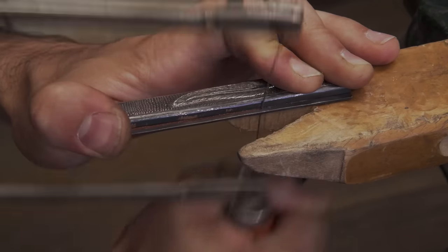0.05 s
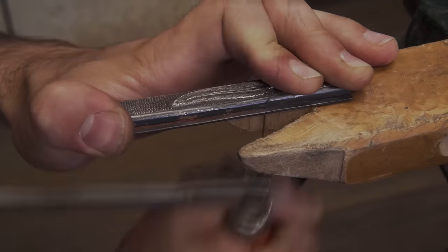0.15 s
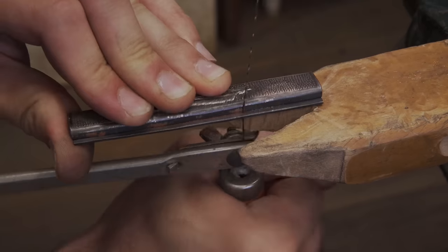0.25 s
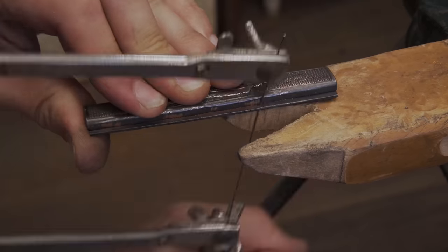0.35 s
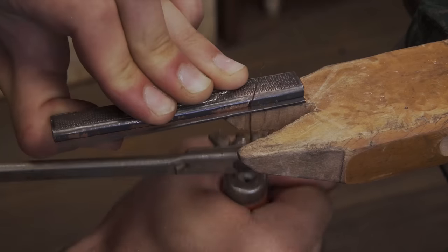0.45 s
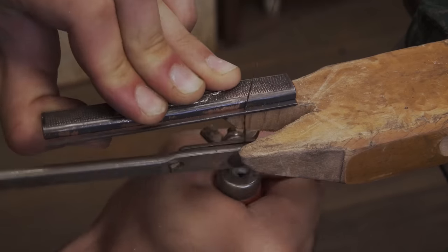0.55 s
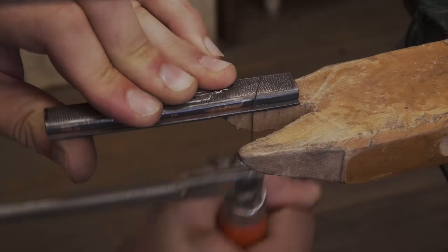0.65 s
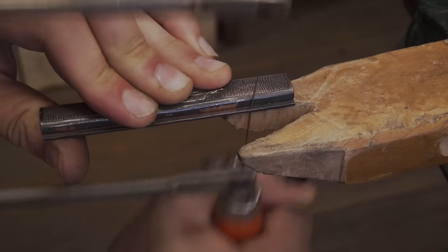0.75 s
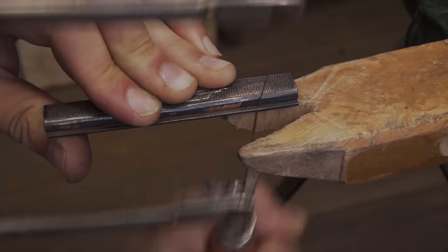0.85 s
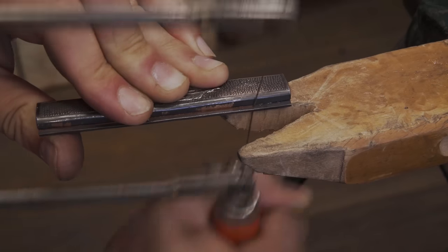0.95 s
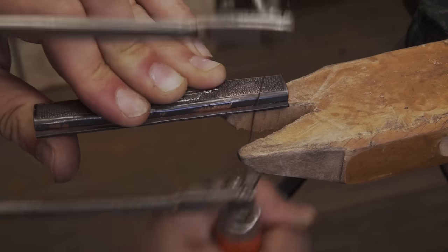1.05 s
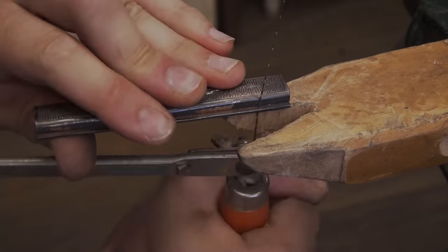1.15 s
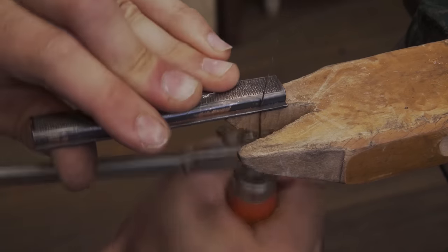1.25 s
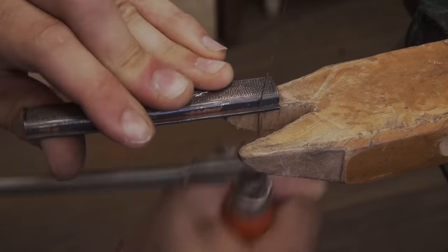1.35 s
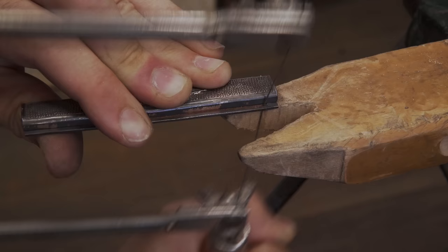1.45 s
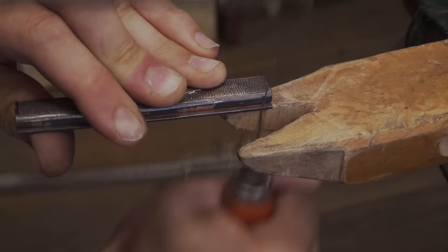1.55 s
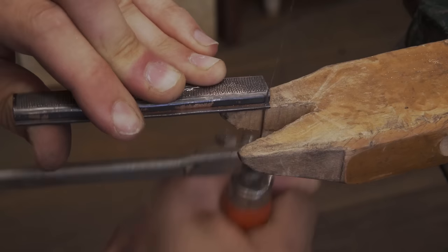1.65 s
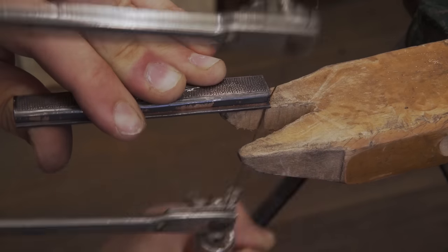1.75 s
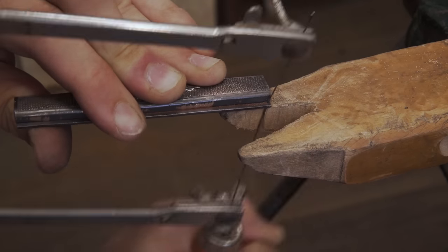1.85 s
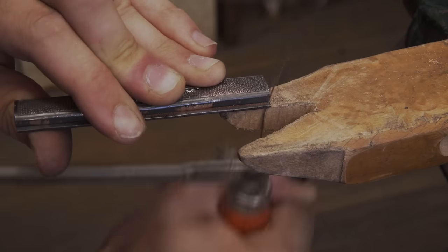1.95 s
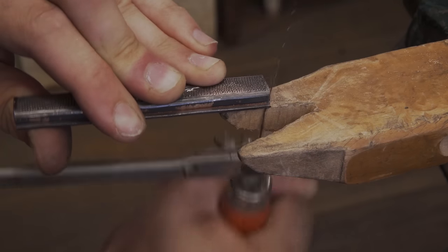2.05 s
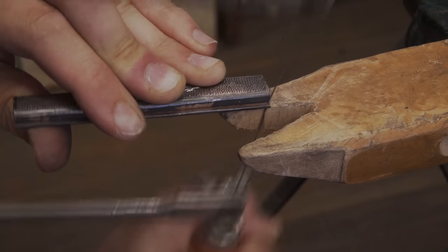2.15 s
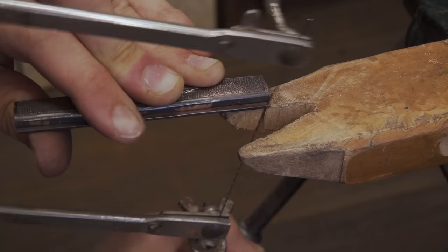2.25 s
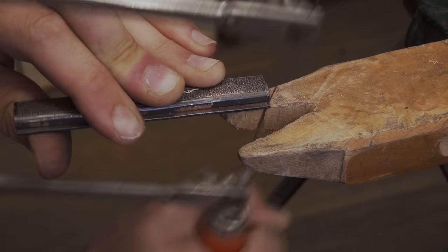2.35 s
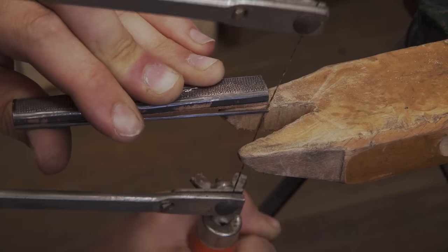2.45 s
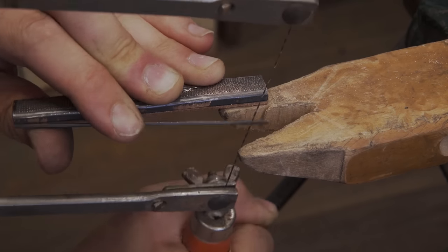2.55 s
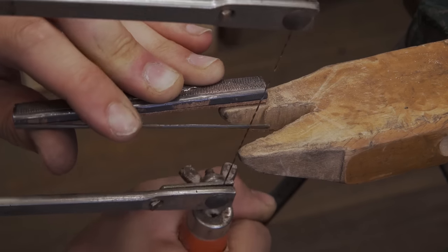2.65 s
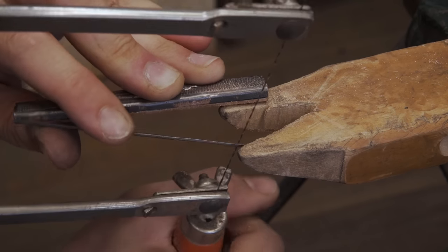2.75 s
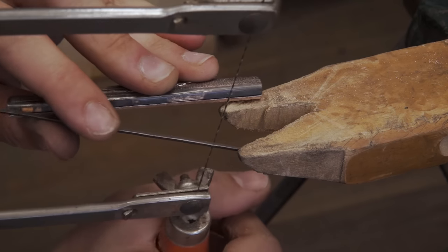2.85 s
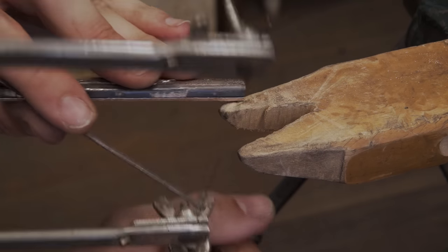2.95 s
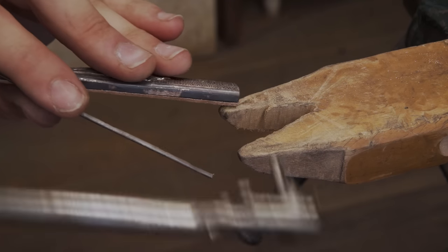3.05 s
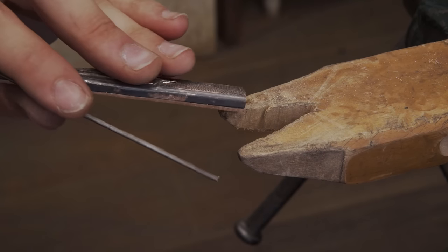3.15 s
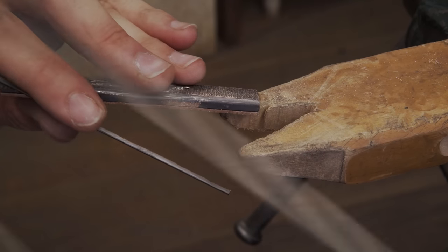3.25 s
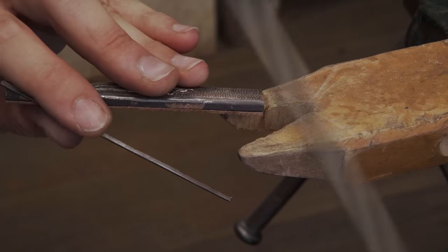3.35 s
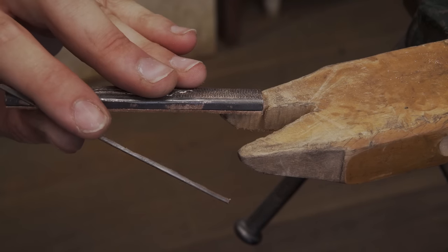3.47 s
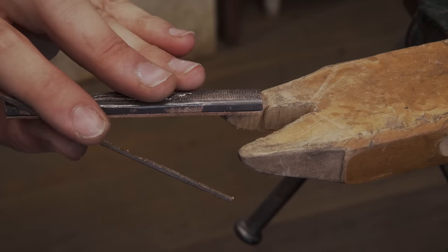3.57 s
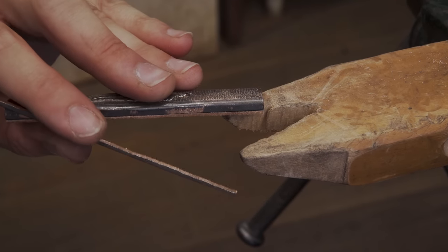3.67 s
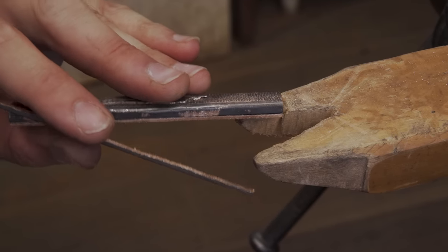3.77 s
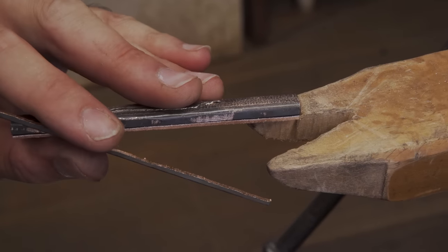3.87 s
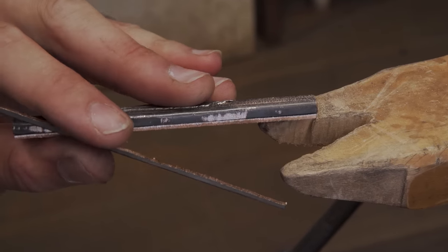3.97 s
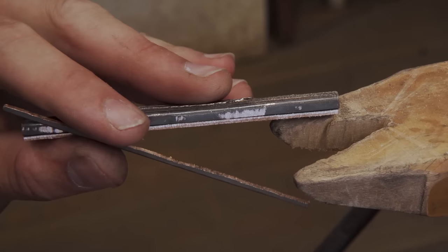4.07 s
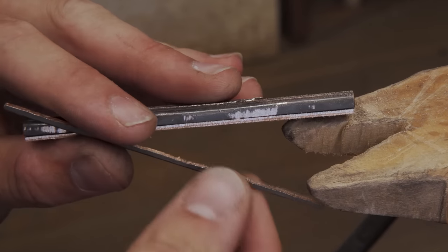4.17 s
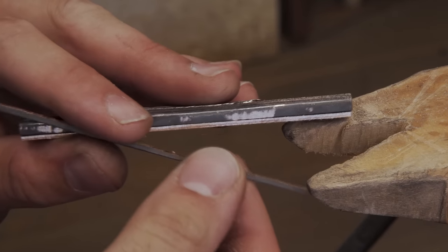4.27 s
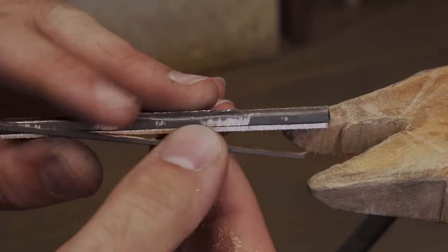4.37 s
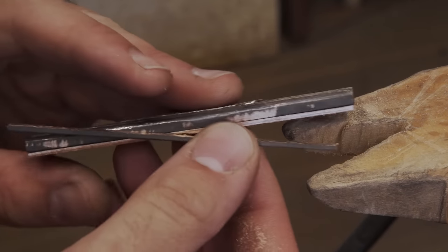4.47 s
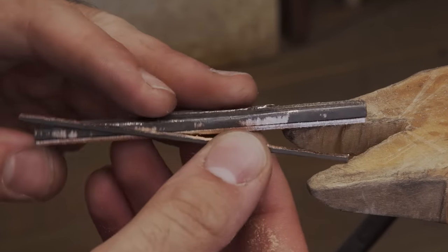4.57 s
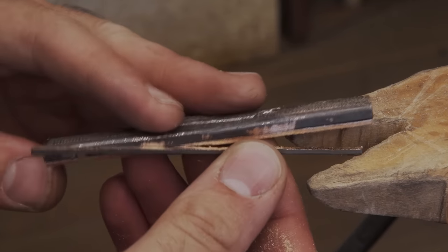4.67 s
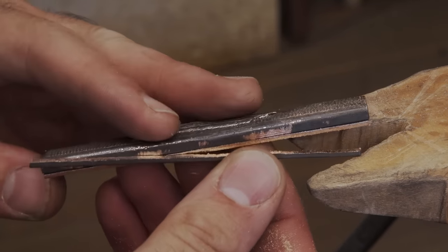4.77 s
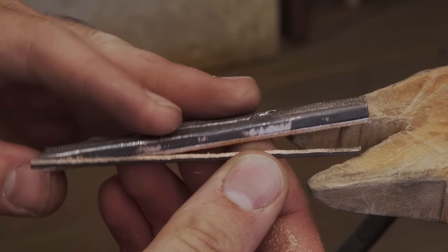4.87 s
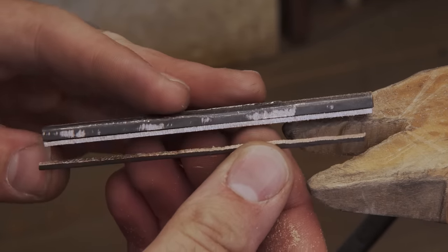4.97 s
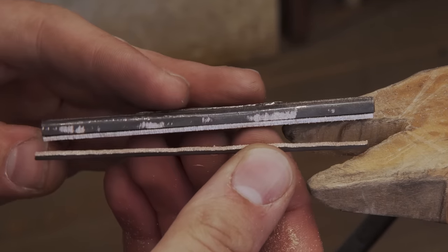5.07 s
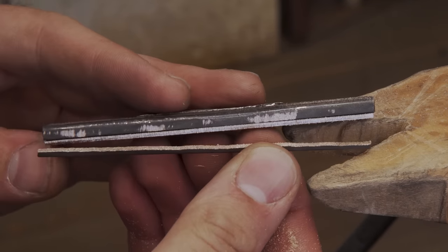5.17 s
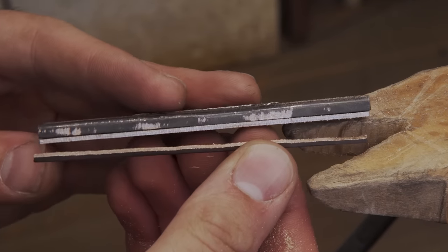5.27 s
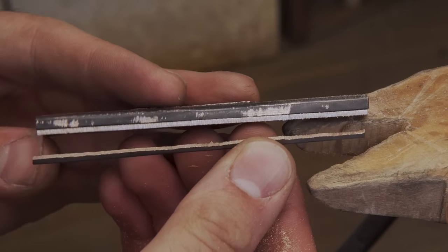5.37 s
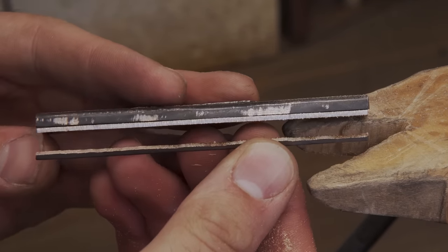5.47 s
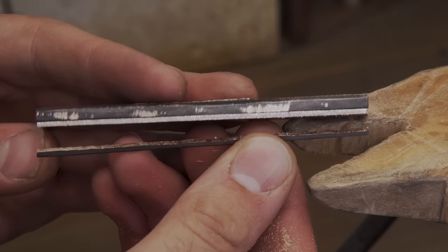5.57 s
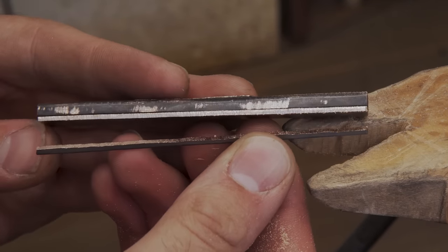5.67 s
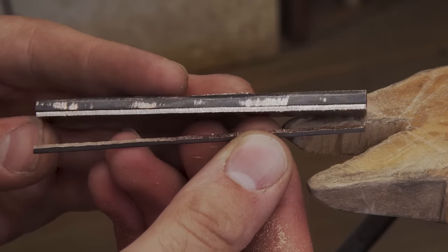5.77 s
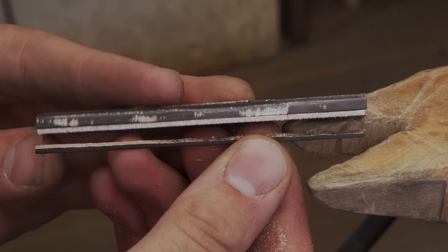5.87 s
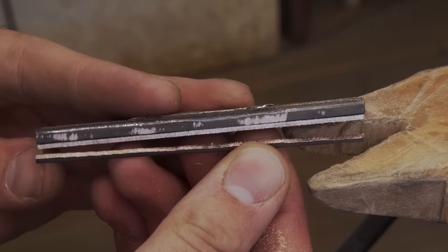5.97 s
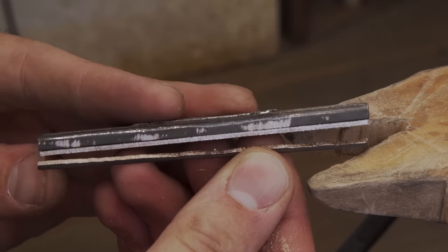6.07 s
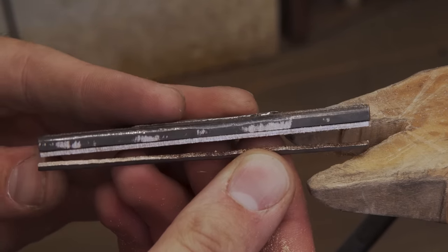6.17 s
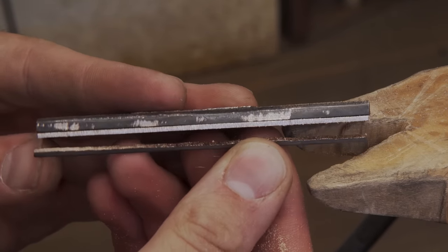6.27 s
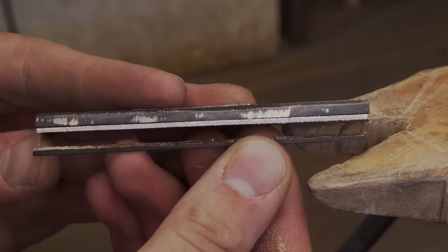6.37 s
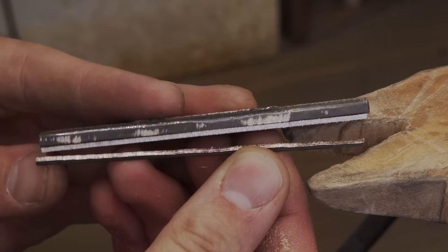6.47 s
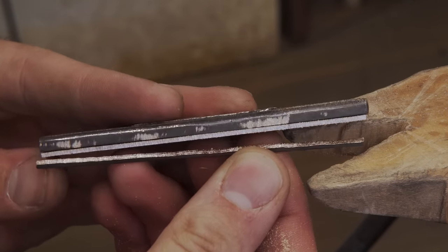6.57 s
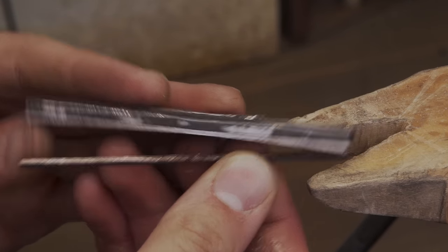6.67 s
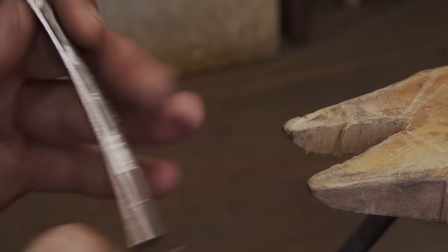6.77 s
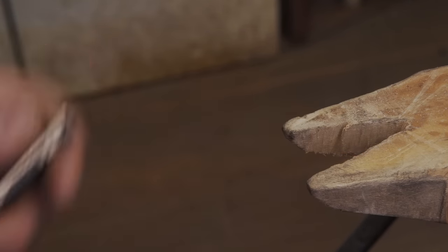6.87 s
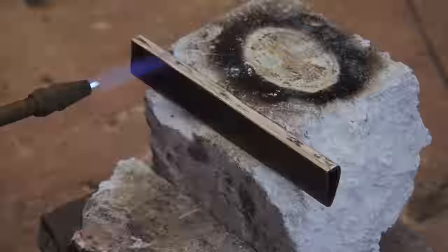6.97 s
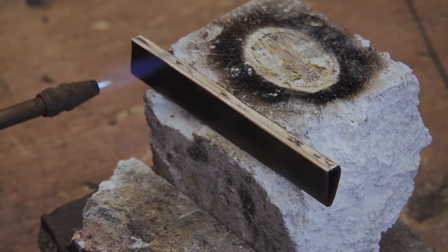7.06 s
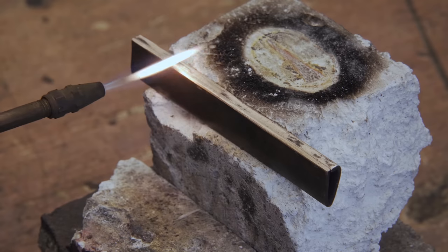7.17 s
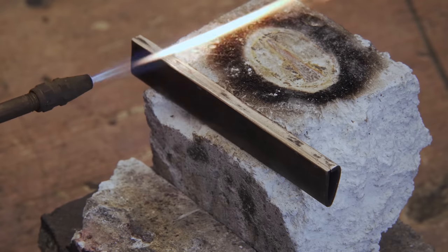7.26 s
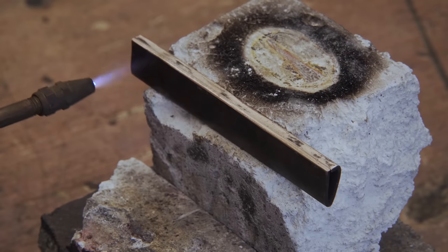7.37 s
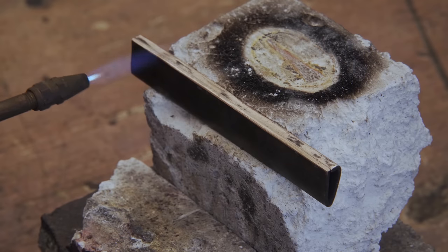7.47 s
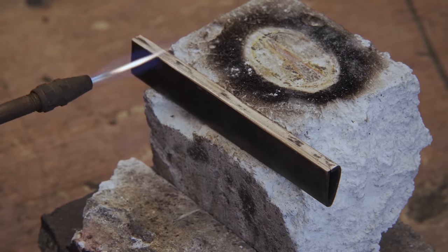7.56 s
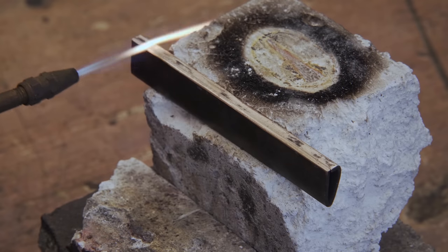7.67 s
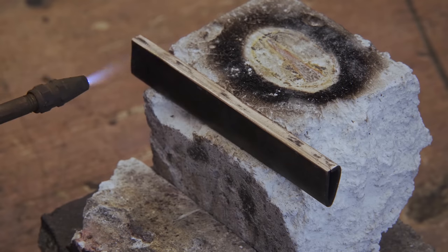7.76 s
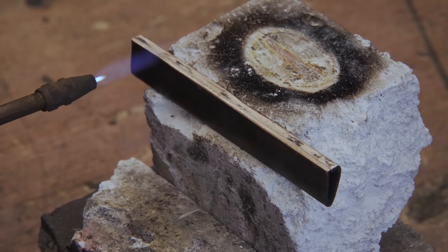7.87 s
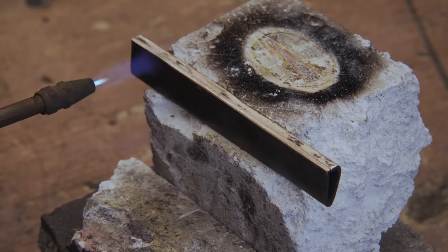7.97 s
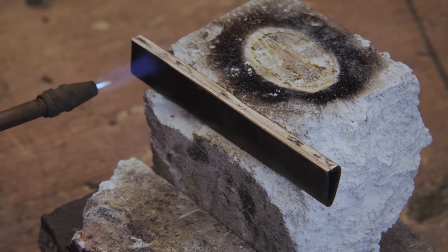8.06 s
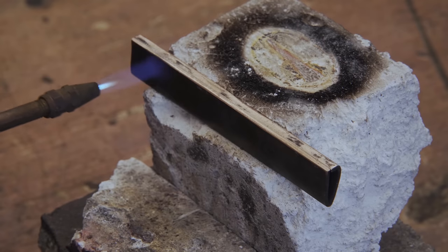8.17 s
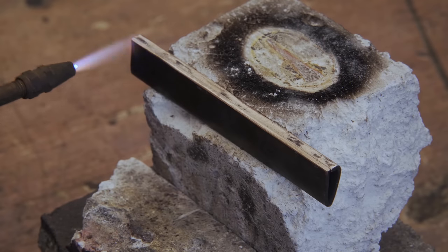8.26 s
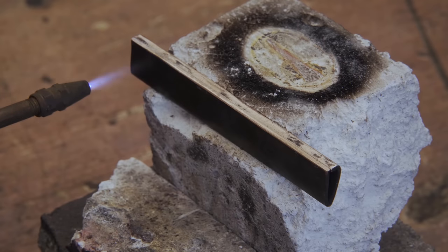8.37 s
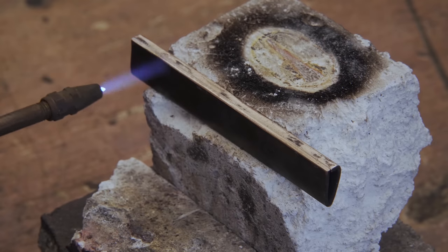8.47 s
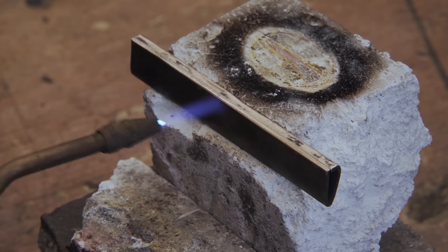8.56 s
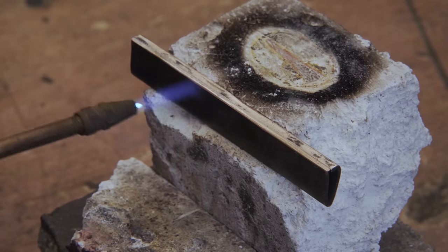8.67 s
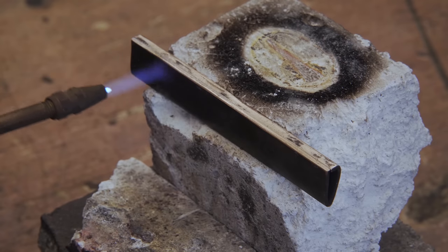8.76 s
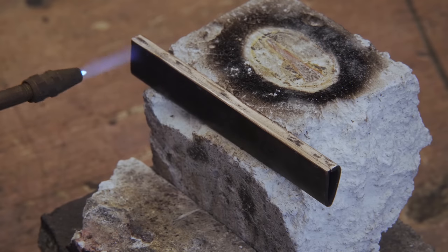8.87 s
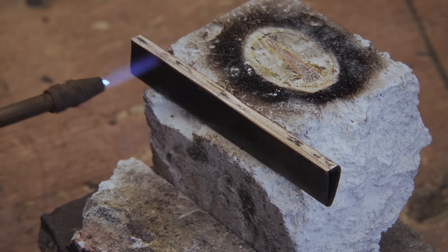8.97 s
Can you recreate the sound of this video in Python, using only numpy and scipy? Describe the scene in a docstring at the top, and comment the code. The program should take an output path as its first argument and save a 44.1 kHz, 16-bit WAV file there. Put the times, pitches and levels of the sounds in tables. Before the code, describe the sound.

Close up, a fine blade rasps fast and bright through thin metal, with brief catches and dry ticks. After a tiny gap come nine quick, gritty strokes. The strip scrapes and clinks in the fingers, and a steel frame lands on the wooden bench with a hard knock. An engine drones faintly outside. Finally a small torch spits thin hiss and its draught thumps softly at the microphone.

```python
"""A fine saw blade rasps fast through thin metal, then after a short silence come quick back-and-forth strokes.
Close by, the strip scrapes and clinks in the fingers and the steel frame is laid on the wooden bench;
an engine drones outside the workshop. Last, a small gas torch spits and its draught buffets the microphone.
Saw and torch are filtered noise with random tooth-like pulses; metal and wood are struck decaying modes;
engine and hums are sines; the workshop air is resonant noise and the room a short noise tail."""
import sys
import numpy as np
from scipy import signal
from scipy.fft import rfft, irfft
from scipy.io import wavfile
from scipy.ndimage import uniform_filter1d

SR = 44100
rng = np.random.default_rng(int(sys.argv[2]) if len(sys.argv) > 2 else 0)


def waveform_to_disk(signal):
    """Save audio, clipped to [-1, 1], as 16-bit WAV at the path in sys.argv[1]."""
    frames = np.transpose(np.atleast_2d(signal))
    scaled = np.clip(frames, -1, 1) * 32767
    samples = np.round(scaled).astype(np.int16)
    wavfile.write(sys.argv[1], SR, samples)


N = 397771
T = np.arange(N) / SR


def undb(db):
    """Decibels to an amplitude factor."""
    return 10 ** (np.asarray(db) / 20)


def unit(x):
    """Scale to an RMS of one."""
    return x / np.sqrt(np.mean(x ** 2))


def curve(rows, silent_db=-140):
    """Interpolate each column over time; silent outside the rows."""
    s, *cols = np.transpose(rows)
    return [np.interp(T, s, c, silent_db, silent_db) for c in cols]


def band(x, lo_hz, hi_hz):
    """Band-pass filter."""
    sos = signal.butter(2, [lo_hz, min(hi_hz, .45 * SR)], "bandpass", fs=SR, output="sos")
    return signal.sosfilt(sos, x)


def noise_band(lo_hz, hi_hz):
    """Steady random noise between two frequencies, RMS one."""
    return unit(band(rng.standard_normal(N), lo_hz, hi_hz))


def sine(phase, db):
    """A pure tone with its RMS level in dB."""
    return np.sqrt(2) * undb(db) * np.sin(phase)


def walk(rate):
    """A random level with a new target every 1 / rate s, slewed between them; RMS one."""
    k = int(SR / rate)
    held = np.repeat(rng.standard_normal(N // k + 1), k)
    return unit(uniform_filter1d(held, k)[:N])


def lowpass_both_ways(x, hz):
    """Low-pass without delay, so that subtracting it leaves the treble."""
    return signal.sosfiltfilt(signal.butter(2, hz, fs=SR, output="sos"), x)


def body(x, colour, modes, base_db, size=8192):
    """Causal minimum-phase filter: a broad colour with resonances standing on it."""
    hz = np.maximum(np.fft.rfftfreq(size, 1 / SR), 1)
    colour_hz, colour_db = np.array(colour).T
    power = undb(2 * (base_db + np.interp(np.log(hz), np.log(colour_hz), colour_db)))
    power = power + sum(undb(2 * db) / (1 + (2 * (hz - f) / w) ** 2) ** 2 for f, w, db in modes)
    # folding the cepstrum forward in time makes the response causal
    cep = irfft(np.log(power) / 2)
    cep[1:size // 2] *= 2
    cep[size // 2 + 1:] = 0
    return unit(signal.fftconvolve(x, irfft(np.exp(rfft(cep))))[:N])


def teeth(rate, spread_db, hiss):
    """Teeth catching at random moments with uneven force, over sliding noise."""
    hit = rng.random(N) < rate / SR
    size = np.minimum(rng.exponential(1, N), 3)
    sign = np.sign(rng.standard_normal(N))
    return unit(hit * undb(spread_db * size) * sign) + hiss * rng.standard_normal(N)


def hump(s, width):
    """A swell that is down by half at width / 2 from its middle."""
    return np.exp(-np.log(2) * (2 * (T - s) / width) ** 2)


def decay(t, t60):
    """Exponential fade, 60 dB down after t60 seconds."""
    return np.exp(-np.log(1000) * t / t60)


def strike(events, modes, octaves, crack_db, crack_s, scatter_db=3, size=SR // 2):
    """Each blow rings the modes near its colour and adds a fading crack of noise."""
    out, t = np.zeros(N + size), T[:size]
    for s, db, colour in events:
        ring = 0
        for f, g, t60 in modes:
            level_chance, pitch_chance = rng.standard_normal(2)
            mode_db = g + scatter_db * level_chance - 2.8 * (np.log2(f / colour) / octaves) ** 2
            mode_hz = f * (1 + 0.0039 * pitch_chance)
            ring = ring + undb(mode_db) * np.sin(2 * np.pi * mode_hz * t) * decay(t, t60)
        ring = band(ring, modes[0][0] * 0.74, 24000)  # small things radiate no bass
        edges = colour / 2 ** octaves, min(colour * 2 ** octaves, 12000)
        crack = unit(band(band(rng.standard_normal(size), *edges), *edges)) * decay(t, crack_s)
        # crack_db sets the crack's starting RMS against the ring's peak
        blow = -ring / np.abs(ring).max() + undb(crack_db) * crack
        at = int(s * SR)
        out[at:at + size] += undb(db) * blow
    return out[:N]


# passages of the scene: start t/s, end t/s
PASSAGES = [(0, 1.7115), (1.7525, 2.622), (2.622, 7.021), (7.021, 9.1)]


def passage(k):
    """Gate that is open during one passage, with 1 ms edges; the first starts already open."""
    start, end = PASSAGES[k]
    return np.clip(np.minimum(T - start + (k == 0), end - T) / .001, 0, 1)


# blade in thin metal: t/s, level/dB before halving, low body against level/dB,
# treble against level/dB before a 7.5 dB lift
RASP = [(0, -31.5, -6.5, 1.5), (.27, -32.5, -9, -2), (.3, -22.5, -21.5, -22.5), (.7, -23.5, -17.5, -11.5),
        (.76, -24.5, -19, -12.5), (1.16, -24, -22.5, -16), (1.23, -18.5, -22, -12.5),
        (1.42, -28, -16.5, -7), (1.71, -31.5, -10, -1)]
# broad colour of blade and workpiece: f/Hz, level/dB per Hz
RASP_COLOUR = [(180, -36.5), (300, -28), (1010, -33.5), (2000, -21), (2280, -24), (3190, -12.5),
               (4160, -13.5), (5800, -6.5), (8090, 2), (13100, -6), (16000, -27)]
# their resonances: f/Hz, width/Hz, level/dB
RASP_MODES = [(1100, 70, -26.5), (1372, 99, -22), (1994, 245, -15.5), (3065, 37, -14.5), (4403, 95, -8.5),
              (4700, 81, -7), (5846, 265, 2.5), (6880, 680, 3), (7500, 120, -14.5), (8025, 280, 6.5),
              (9000, 230, 1.5), (9280, 510, 0), (9600, 50, -18.5), (10400, 860, -8), (10870, 73, -17),
              (11450, 590, -6.5), (12700, 380, -18)]
# pauses as the blade turns round: middle t/s, width/s (a quarter of the depth at its edges), depth/dB
TURNS = [(.283, .02, -15.5), (.33, 0.0077, -15), (.396, 0.013, -9), (.481, 0.016, -6), (.563, 0.0069, -9),
         (.664, .009, -11), (.697, 0.018, -8), (.742, 0.0099, -17.5), (1.175, .022, -29),
         (1.204, 0.032, -28)]


def rasp():
    """Thousands of teeth a second ring blade and workpiece; the level drops where the blade turns."""
    db, low_db, high_db = curve(RASP)
    pause_db = sum(depth * hump(s, w) ** 2 for s, w, depth in TURNS)
    db = db + 1.16 * walk(90)
    high_db = high_db + 2.34 * walk(25.9)  # the treble flickers
    sound = body(teeth(4000, 3.0, .7), RASP_COLOUR, RASP_MODES, -5)
    low = lowpass_both_ways(sound, 2600)
    below_treble = lowpass_both_ways(sound, 7600)
    middle = unit(below_treble - low)
    high = unit(sound - below_treble)
    out = undb(db + pause_db) * (middle + undb(high_db + 7.5) * high) / 2
    # the low body rings on through the pauses
    low_level = undb(db + low_db + 0.32 * pause_db + 1.86 * walk(29.78))
    return out + low_level * low / np.std(band(low, 900, 3100))


# low rumble under the blade: swell t/s, width/s, swell level/dB, steady level/dB
RUMBLE = (.16, .11, -41, -62)


def rasp_rumble():
    """Low noise that swells once over a steady floor."""
    s, w, swell_db, rest_db = RUMBLE
    return (undb(swell_db) * hump(s, w) + undb(rest_db)) * noise_band(110, 196)


# deep rumble of the building: level/dB, one for each passage
DEEP_DB = [-66.5, -64, -64, -74]


def building_rumble():
    """Deep steady noise, at its own level in each passage."""
    return noise_band(24.2, 100) * sum(passage(k) * undb(db) for k, db in enumerate(DEEP_DB))


def side_noise():
    """Low noise, opposite in the two channels, in the first passage only."""
    return undb(-66.5) * passage(0) * noise_band(40, 1100)


# dry ticks in evenly spaced groups: first t/s, count, share of bass in the first (0-1)
TICKS = [(.2703, 3, 1), (.4703, 2, 1), (.687, 2, 0)]


def ticks():
    """Single short pulses; a swing back on each side of a pulse cancels its bass."""
    gap_s, level_db = .0427, -9.5
    out = np.zeros(N)
    for first, count, bass in TICKS:
        for k in range(count):
            back = np.array([-.3, -.45, -.15]) * (1 - bass * (k == 0))
            at = int((first + k * gap_s) * SR)
            out[at - 4:at + 5] += undb(level_db) * np.array([*back, .45, .9, .45, *back[::-1]])
    return out


# a brief hum: middle t/s, width/s, f/Hz, level/dB
BRIEF_HUM = (.58, .15, 290, -50)


def brief_hum():
    """One swelling tone with a wavering pitch."""
    s, w, hz, db = BRIEF_HUM
    phase = 2 * np.pi * np.cumsum(hz * (1 + .03 * walk(15))) / SR
    return hump(s, w) * sine(phase, db)


# separate cutting strokes: middle t/s, level/dB
STROKES = [(1.792, -18), (1.877, -17), (1.959, -16.5), (2.042, -15.5), (2.12, -16), (2.202, -17),
           (2.282, -16), (2.361, -16), (2.44, -18.5)]
# broad colour of the strokes: f/Hz, level/dB per Hz
STROKE_COLOUR = [(180, -33), (300, -31.5), (624, -20), (787, -27.5), (1460, -18), (2140, -14.5),
                 (2320, -15), (4440, 0.5), (6100, -15), (10600, -17), (16000, -31)]
# resonances of the strokes: f/Hz, width/Hz, level/dB
STROKE_MODES = [(787, 95, -7.5), (1841, 25, -4), (2330, 130, -0.5), (2746, 400, -2.5), (3216, 170, 2),
                (3690, 180, -0.5), (4000, 80, -4.5), (4470, 61, -20), (5290, 350, -5), (6570, 69, -13),
                (7270, 160, -10), (7600, 68, -6), (8460, 120, -17), (8800, 65, -5), (9630, 55, -10),
                (10330, 350, -4.5), (11100, 150, -8.5)]


def strokes():
    """Each stroke swells and fades; the treble leads as the blade speeds up, the lower tones follow."""
    width_s, return_db, first_return_s = .021, -25.5, 1.756
    slip, shrink = .0069, .013  # returns shift later and shorten, s for each second, counted from 2 s
    rise_share = 0.86  # width of the swell as a share of the fade
    grit = teeth(1800, 2.0, .7)
    low = lowpass_both_ways(grit, 3400)
    cuts = np.array(STROKES)[:, 0]
    rows = [(s, width_s, db) for s, db in STROKES]
    # the idle return lies about midway between cuts
    for s in [first_return_s, *(cuts[1:] + cuts[:-1]) / 2]:
        rows.append((s + slip * (s - 2), width_s - shrink * (s - 2), return_db))

    def swell(lag_s):
        power = 0
        for s, w, db in rows:
            middle = s + lag_s
            shape = np.where(T < middle, hump(middle, w * rise_share), hump(middle, w))
            power = power + undb(2 * db) * shape ** 2
        return np.sqrt(power)

    early, late = swell(-.003), swell(.003)
    sound = body(early * (grit - low) + late * low, STROKE_COLOUR, STROKE_MODES, -0.5)
    return sound * np.sqrt(np.mean(late ** 2))


# workshop air in the last three passages, one row each: [colour f/Hz, level/dB per Hz],
# [resonance f/Hz, width/Hz, level/dB], level/dB
AIR = [([(18, -41), (30, 3), (124, -3.5), (311, -10.5), (1100, -1.5), (1540, -9), (5450, -17), (9970, -19),
       (16000, -24)], [(1180, 180, 2)], -45.5), ([(53, -36), (90, -21), (210, -14.5), (568, -4.5),
       (706, -13.5), (839, -11.5), (1350, -16), (1610, -15), (2090, -23), (3220, -26), (5070, -33),
       (9720, -40), (16000, -53)], [(567.3, 38, 0.5), (785, 52, -13), (1330, 5.3, -15), (1652, 27, -8.5),
       (2780, 44, -24), (3220, 32, -21)], -47), ([(35, -57), (60, -9.5), (133, -9), (216, -14), (234, -17),
       (271, -10.5), (301, -13.5), (422, -6.5), (727, -2), (1130, -12.5), (1990, -10.5), (2840, -18),
       (9000, -32.5), (11700, -76), (19800, -120)], [(729, 33, 5.5), (1225, 18, -3.5), (2000, 280, -10),
       (3120, 77, -18.5), (3980, 250, -19), (4640, 390, -21.5)], -48)]


def workshop_air():
    """Resonant noise that wavers a little, with its own colour in each passage."""
    out = np.zeros(N)
    for k, (colour, modes, db) in enumerate(AIR, start=1):
        air = body(rng.standard_normal(N), colour, modes, 0)
        out += passage(k) * undb(db + 0.23 * walk(9)) * air
    return out


# what the strip rings with: f/Hz, level/dB (halved for scrapes), t60/s (clinks only)
STRIP = [(1860, -1, .04), (2150, -8, .03), (2800, -13, .03), (3600, -8, .03), (4200, -12, .03),
         (4860, -4, .025), (5130, -2, .035), (5800, -13, .03), (6520, 0, .03), (8250, -9, .03),
         (9200, -13, .03), (10300, -6, .035), (11200, -14, .04), (13400, -10, .03)]
# short scrapes of blade and strip: middle t/s, width/s, level/dB, colour f/Hz
SCRAPES = [(2.484, 0.013, -38, 4000), (2.549, 0.0046, -30.5, 9600), (2.561, 0.016, -32.5, 9600),
           (2.597, 0.0092, -40, 9050), (2.632, 0.013, -56, 5800), (2.66, 0.0086, -46, 4970),
           (2.706, .013, -35.5, 6400), (2.733, .014, -35, 4300), (2.756, .015, -45, 4940),
           (2.818, .038, -47, 9200), (2.858, 0.016, -41, 8900), (2.985, 0.027, -46, 8300),
           (2.99, .03, -46, 2960), (3.03, 0.016, -42.5, 6100), (4.33, 0.051, -47.5, 2160),
           (6.702, 0.021, -38, 1900), (6.723, 0.01, -38.5, 5500), (6.73, 0.022, -39.5, 1900),
           (6.75, .017, -42.5, 5000), (6.769, 0.02, -34, 8300)]


def scrapes():
    """Gritty rubs: a broad colour, and the strip's modes near it ring along."""
    reach_octaves, ring_share = 0.33, 0.018  # reach of the colour; half width of a ring over its pitch
    out = np.zeros(N)
    for s, w, db, colour in SCRAPES:
        part = slice(int((s - .08) * SR), int((s + .08) * SR))
        grit = rng.standard_normal(part.stop - part.start)
        ring = 0
        for f, g, _ in STRIP:
            mode_db = g / 2 + 5 * rng.standard_normal() - 3.9 * (np.log2(f / colour) / reach_octaves) ** 2
            ring = ring + undb(mode_db) * unit(band(grit, f * (1 - ring_share), f * (1 + ring_share)))
        broad = unit(band(grit, colour / 9.9, colour * 1.86))
        out[part] += undb(db) * hump(s, w)[part] * unit(unit(ring) + undb(-6) * broad)
    return out


# faint rustle of hands and sleeve: middle t/s, width/s, level/dB
RUSTLE = [(2.7, 1, -54.5), (3.5, 0.56, -69), (4.05, 0.36, -57), (6.86, .17, -53)]


def rustle():
    """Soft swells of hiss, from the third passage on."""
    level = sum(undb(db) * hump(s, w) for s, w, db in RUSTLE)
    return noise_band(1400, 8700) * (T > PASSAGES[2][0]) * level


# engine outside the workshop: t/s, f/Hz, level/dB
ENGINE = [(2.62, 54, -68), (2.77, 59, -58.5), (3.12, 56, -67), (3.24, 59, -70), (3.75, 58.57, -46.5),
          (4.04, 57.5, -65.5), (4.68, 55.7, -50), (5.22, 55.3, -55), (5.32, 58.0, -66), (5.43, 64.3, -39.5),
          (5.52, 90.8, -58), (5.66, 87, -54), (5.81, 62.6, -43.5), (5.92, 57.9, -62), (6.16, 56.9, -48.5),
          (6.75, 60, -47), (6.91, 70.6, -45), (7.02, 72.7, -53)]


def engine():
    """A low tone and its faint octave, changing in pitch and level."""
    hz, db = curve(ENGINE)
    phase = 2 * np.pi * np.cumsum(hz) / SR
    return sine(phase, db) + sine(2 * phase, db - 19.5)


# steady tones: f/Hz, level/dB, passage (from 0); the lowest pair beats five times a second
TONES = [(28, -61.5, 2), (33, -72, 2), (100, -70, 2), (1291, -63.5, 2), (34.4, -62, 3), (280, -66, 3)]


def hums():
    """Pure tones, each held through one passage."""
    return sum(passage(k) * sine(2 * np.pi * f * T, db) for f, db, k in TONES)


# clinks of the strip in the fingers: t/s, ring peak level/dB, colour f/Hz
CLINKS = [(2.623, -46, 5800), (2.678, -36, 8200), (2.7, -29, 7000), (2.727, -33, 2200), (2.803, -36, 6130),
          (2.849, -42, 7000), (2.93, -46, 8000), (2.947, -22.5, 8950), (4.212, -30.5, 2670),
          (4.395, -19.5, 5260), (4.574, -28, 1630), (4.615, -45, 7000), (4.835, -37.5, 5440),
          (4.934, -28, 6220), (5.997, -38.5, 4000), (6.671, -41, 5490), (6.713, -35, 5960)]
# stretches of faint rattle: start t/s, end t/s, clinks a second
RATTLE = [(2.63, 3.07, 35), (4.3, 4.7, 8), (6.68, 6.78, 50)]


def clinks():
    """The struck strip rings briefly; fainter clinks are scattered in time, strength and colour."""
    faint = []
    for start, end, rate in RATTLE:
        for when, size, tone in rng.random((int((end - start) * rate), 3)):
            s = start + when * (end - start)
            faint.append((s, -44 + 8 * (size - .5), 5500 * 2 ** (2 * tone - 1)))
    return strike(CLINKS + faint, STRIP, 0.52, -11, 0.015, scatter_db=4.0, size=SR // 8)


# a steel part left ringing: t/s, ring peak level/dB, colour f/Hz
PING = [(3.023, -33.5, 2500)]
# its modes: f/Hz, level/dB, t60/s
ROD = [(2400, 8, 0.064), (4720, -9, 1.6), (7187, -7.5, 1.9), (9660, -11, 1.4), (12580, -9, 0.81),
       (15600, -10, .35)]


def ping():
    """One blow on steel whose upper modes decay slowly."""
    return strike(PING, ROD, 3.5, -5, .04, scatter_db=0, size=SR)


# knocks of the steel frame: t/s, ring peak level/dB, colour f/Hz, crack against ring/dB,
# share of the ring time left when the bench damps it
KNOCKS = [(3.5892, -18.5, 5650, -7, 0.91), (3.7592, -22, 6200, -6.5, 0.94),
          (3.8635, -12.5, 7000, -4.5, 0.31), (3.9037, -21.5, 3000, -3.5, 0.32),
          (3.9292, -25, 8000, -4.5, .35)]
# modes of the frame: f/Hz, level/dB, undamped t60/s
FRAME = [(1945, -3, .06), (2700, -4, .11), (3440, -2, .1), (4200, -7, .18), (4500, -5, .09),
         (5140, -3, .11), (6100, -3, .1), (7200, -9, .08), (8100, -11, .1), (9100, -6, .13),
         (10100, -6, .22), (11150, -7, .2), (12050, -9, .06), (13300, -10, .07)]


def frame_knocks():
    """The frame rings at each knock, for as long as the bench lets it."""
    out = np.zeros(N)
    for *knock, crack_db, share in KNOCKS:
        damped = [(f, g, t60 * share) for f, g, t60 in FRAME]
        out += strike([knock], damped, 2.13, crack_db, 0.086)
    return out


# blows on the wooden bench: t/s, ring peak level/dB, colour f/Hz
THUDS = [(3.589, -29.5, 593), (3.760, -33, 1000), (3.846, -22, 1000), (3.857, -4.5, 810),
         (3.862, -20, 1300), (3.870, -44, 890), (3.885, -16.5, 720), (3.904, -15, 1100), (3.917, -27, 1120),
         (3.945, -24.5, 636)]
# modes of the bench: f/Hz, level/dB, t60/s
BENCH = [(300, -9, .2), (340, -4, 0.21), (458, 0, 0.14), (540, -23, 0.07), (700, -3, 0.043),
         (770, 3, 0.025), (1000, -5, 0.16), (1150, 9.5, 0.024), (1480, -7, .07), (1750, 9, 0.015),
         (1900, 11.5, 0.014), (2420, -11, .05)]


def bench_thuds():
    """Wood answers each blow with short modes and a dull crack."""
    return strike(THUDS, BENCH, 1.16, -7.5, 0.093)


# thin ring after the fall: start t/s, end t/s, f/Hz, starting level/dB
AFTER_RING = (3.94, 4.4, 4100, -57)


def after_ring():
    """A narrow band of noise fading in a straight line."""
    start, end, hz, db = AFTER_RING
    fade = np.clip((end - T) / (end - start), 0, 1) * (T > start)
    return undb(db) * fade * noise_band(hz * .95, hz * 1.05)


# torch hiss under the bursts: t/s, level/dB
TORCH = [(7.02, -72), (7.7, -72), (7.9, -67), (8.6, -62.5), (9.02, -75)]
# bursts of the jet: start t/s, end t/s, hiss level/dB, top hiss against it/dB
BURSTS = [(7.016, 7.039, -54, -8), (7.337, 7.428, -50.5, 0), (7.748, 7.8, -48.5, 2),
          (8.247, 8.375, -51, 0.5), (8.381, 8.401, -58, 6.5), (8.501, 8.511, -69, 14),
          (8.657, 9.1, -61.5, 9.5)]
# flares that sweep upward as the jet opens: middle t/s, width/s, level/dB
FLARES = [(7.342, 0.014, -37.5), (7.728, .021, -47), (7.749, 0.012, -38.5)]


def torch():
    """Jet noise in bands with a fine sputter, sharp-edged bursts and upward flares."""
    jet = teeth(3000, 1.8, 1.8) * undb(1.0 * walk(50))
    low = unit(band(jet, 3130, 6300))
    middle = unit(band(jet, 7400, 10000))
    top = unit(band(jet, 12000, 14300))
    upper = noise_band(9800, 12200)
    out = undb(curve(TORCH)[0]) * (middle + top) + passage(3) * undb(-65) * low
    for start, end, db, top_db in BURSTS:
        gate = np.clip(np.minimum(T - start, end - T) / 0.0036, 0, 1)
        # a band under the top hiss fades as the jet settles
        opening = undb(2.5) * np.exp(-np.abs(T - start) / .027) * upper
        out += gate * undb(db) * (middle + undb(-3.5) * low + undb(top_db) * (top + opening))
    for octave in np.arange(-.5, 1.6, .5):
        part = unit(band(jet, 4200 * 2 ** octave, 5900 * 2 ** octave))
        part *= undb(-2.5 * abs(octave) - 3.8 * (octave < 0))
        # each octave higher comes 16 ms later
        out += part * sum(undb(db) * hump(s + .016 * octave, w) for s, w, db in FLARES)
    return out


# draught of the flame on the microphone: t/s, level/dB
BUFFET = [(7.8, -67), (8.026, -52), (8.07, -62), (8.586, -41), (8.762, -46.5), (8.894, -29), (8.976, -42.5),
          (9.02, -38)]


def buffeting():
    """Very low noise in gusts."""
    return undb(curve(BUFFET)[0]) * noise_band(6.0, 54)


def room(near):
    """The room answers with a short tail, duller than the sound itself."""
    tail = rng.standard_normal(SR // 2) * decay(T[:SR // 2], .21)
    tail = band(tail, 92, 4500)
    return undb(-16.5) * signal.fftconvolve(near, tail / np.sqrt(np.sum(tail ** 2)))[:N]


def scene():
    """The fast rasp first, then bench, workshop and torch; mono but for the low side noise."""
    first = passage(0) * (rasp() + rasp_rumble() + ticks() + brief_hum())
    near = strokes() + scrapes() + rustle() + clinks() + ping()
    near += frame_knocks() + bench_thuds() + after_ring()
    near += room(near)
    around = workshop_air() + engine() + hums() + torch() + buffeting()
    mid = first + building_rumble() + (T > PASSAGES[1][0]) * (near + around)
    side = side_noise()
    return np.array([mid + side, mid - side])


def record(dry):
    """The recorder rounds the highest peaks and cuts the top above 15.9 kHz."""
    rounded = 1.1 * np.tanh(dry / 1.1)
    return signal.sosfilt(signal.ellip(8, .2, 70, 15900, fs=SR, output="sos"), rounded)


dry = scene()
out = record(dry)
waveform_to_disk(out)
```